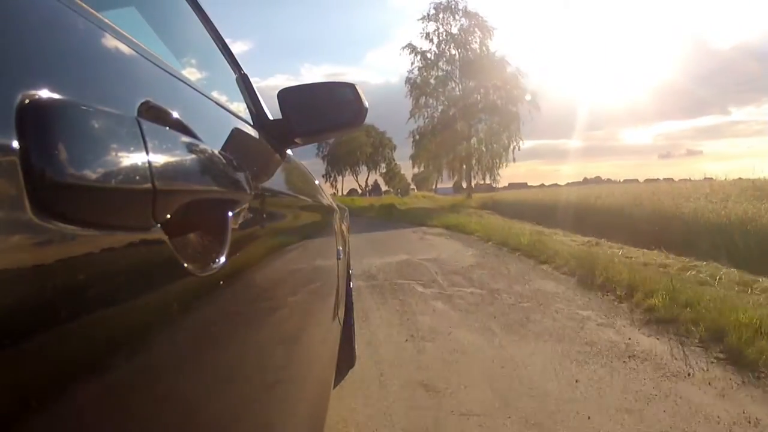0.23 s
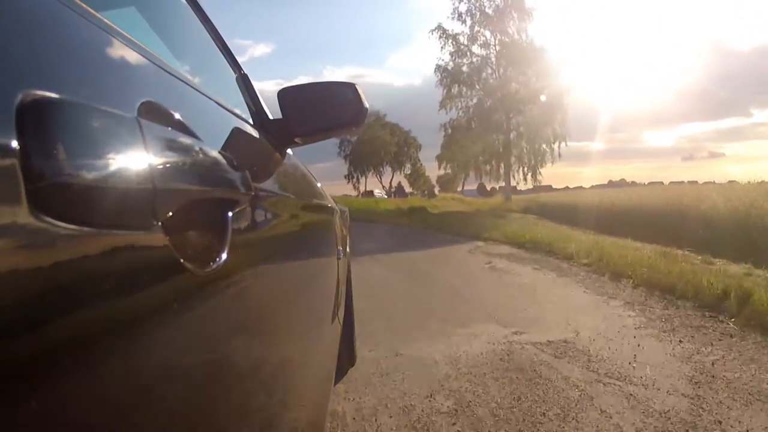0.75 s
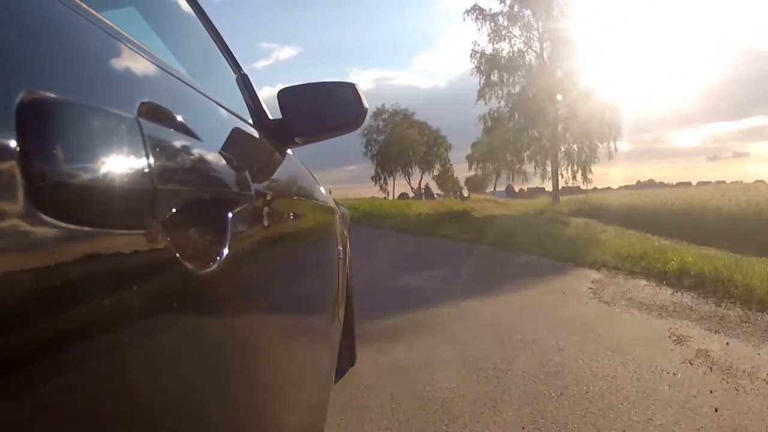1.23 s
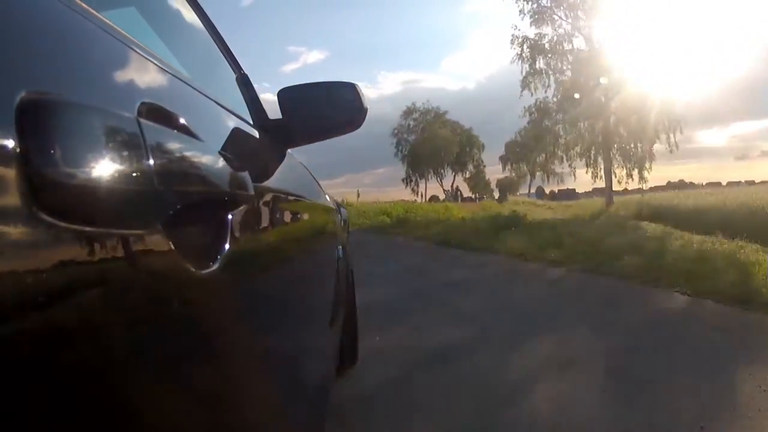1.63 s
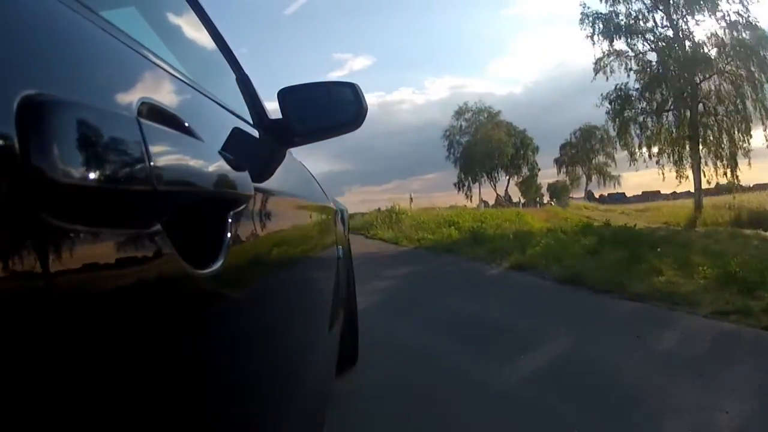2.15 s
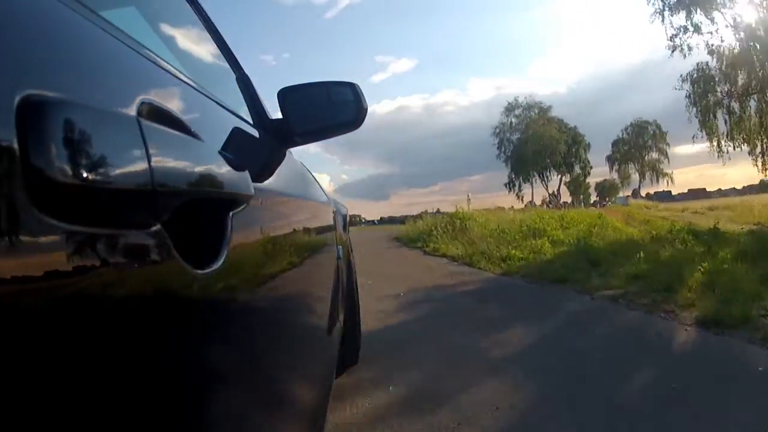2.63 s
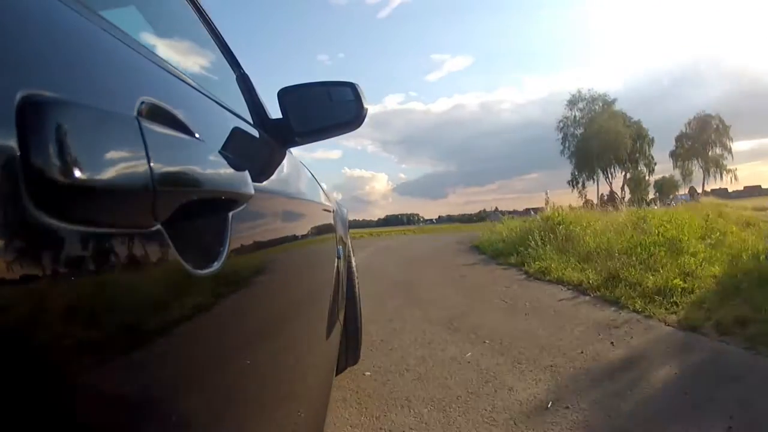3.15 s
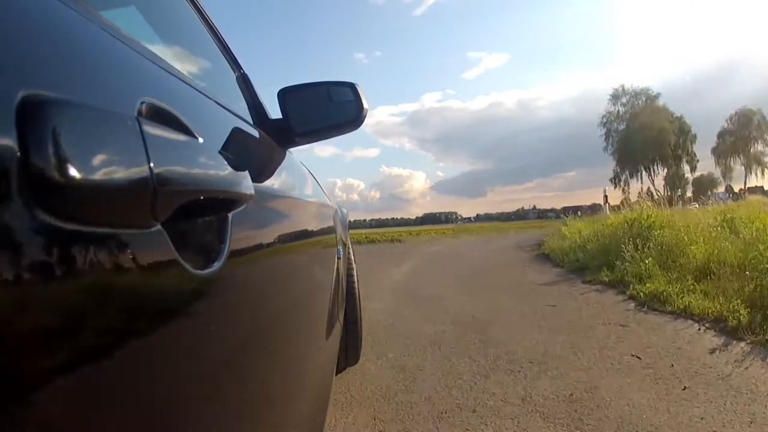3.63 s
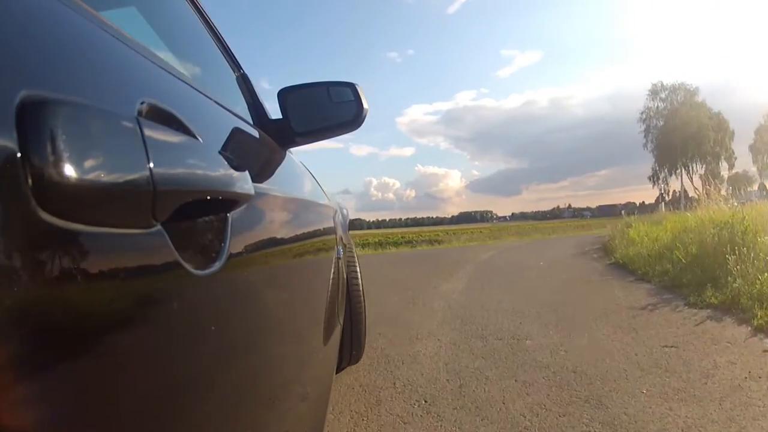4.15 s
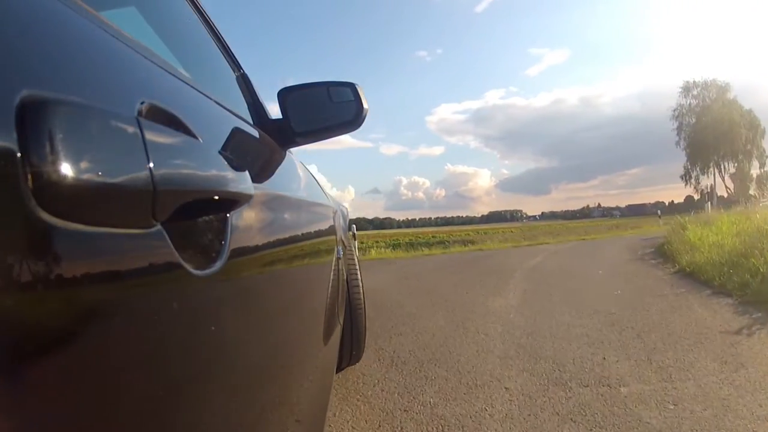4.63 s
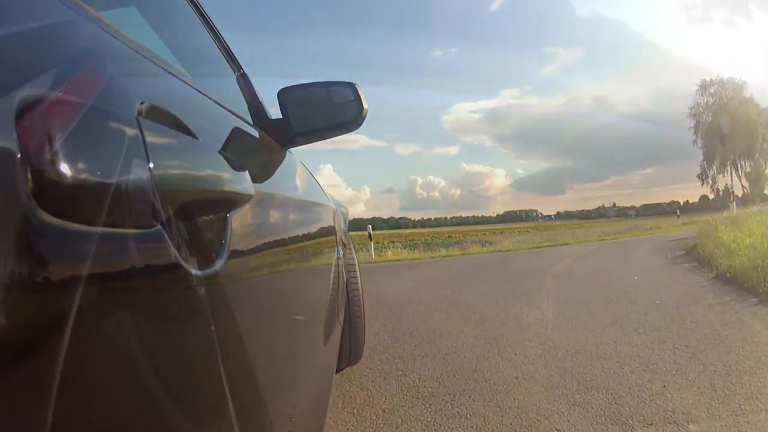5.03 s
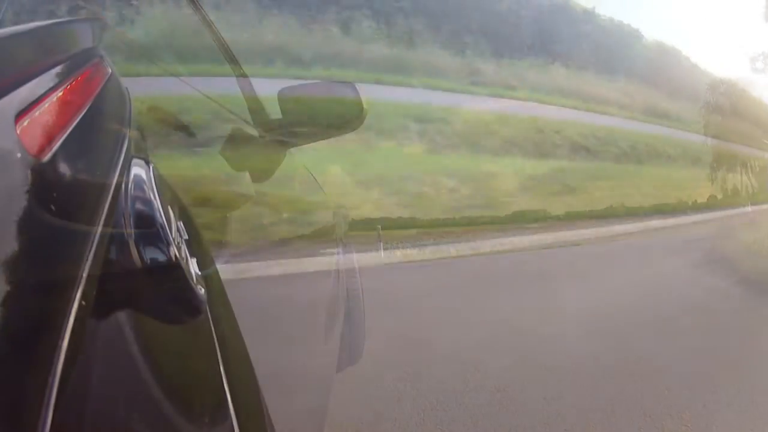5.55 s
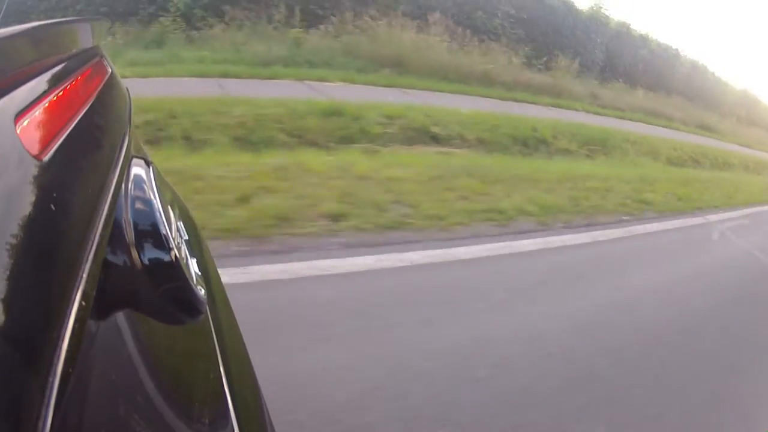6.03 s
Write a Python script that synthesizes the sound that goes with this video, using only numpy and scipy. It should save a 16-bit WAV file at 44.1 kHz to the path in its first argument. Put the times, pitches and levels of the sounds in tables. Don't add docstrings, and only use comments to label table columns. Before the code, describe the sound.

Slowed-down V8 growl with gritty tyre noise and stone ticks sinks to a quiet coasting rumble, before a swaying, buffeted exhaust drone rises.

```python
import sys
import numpy as np
from scipy import signal
from scipy.fft import rfft, irfft, next_fast_len
from scipy.io import wavfile
from scipy.ndimage import uniform_filter1d, map_coordinates

SR = 44100
rng = np.random.default_rng(int(sys.argv[2]) if len(sys.argv) > 2 else 0)


def log_audio(samples):
    frames = np.atleast_2d(samples).T
    limited = np.clip(frames, -1, 1)
    pcm = np.round(limited * 32767).astype(np.int16)
    wavfile.write(sys.argv[1], SR, pcm)


def gain_from_db(level_db):
    decades = np.asarray(level_db, float) / 20
    return 10 ** decades


N = 277377

# [pipe lag t/s, loaded bark level/dB, coasting bark level/dB]
CYLINDERS = [(0, 0, 0), (-.003, -9, -12), (0, -18, -14), (0, -18, -15), (-.002, -15, -11), (0, -18, -14),
             (0, -17, -13), (0, -17, -8)]
# [f/Hz, width/Hz, level/dB]
OVERRUN = [(205, 25, -4), (255, 25, -4), (290, 45, -1), (365, 40, -5), (480, 25, -13)]


def unit(x):
    return x / np.sqrt(np.mean(x ** 2) + 1e-20)


def along(points, hz):
    f, v = np.transpose(points)
    return np.interp(np.log(hz + 1), np.log(f + 1), v)


def curves(rows):
    s, *cols = np.transpose(rows)
    return [np.interp(np.arange(N) / SR, s, c) for c in cols]


def ramp(start_s, end_s):
    return np.interp(np.arange(N) / SR, [start_s, end_s], [0, 1])


def wobble(rate):
    knots = rng.standard_normal(int(N * rate / SR) + 4)
    return map_coordinates(knots, [np.arange(N) * rate / SR])


def filtered(x, response):
    m = next_fast_len(N + SR // 2)
    return irfft(rfft(x, m) * response(np.fft.rfftfreq(m, 1 / SR)), m)[:N]


def above(f, corner_hz, power):
    return 1 / (1 + (corner_hz / (f + 1)) ** power)


def below(f, corner_hz, power):
    return 1 / (1 + (f / corner_hz) ** power)


def noise(spectrum):
    return unit(filtered(rng.standard_normal(N), lambda f: gain_from_db(along(spectrum, f))))


def modes(table):
    def response(f):
        total = 0
        for k, (centre, width, db) in enumerate(table):
            damping = 1j * f * width
            total = total + (-1) ** k * gain_from_db(db) * damping / (centre * centre - f * f + damping)
        return total
    return response


def pipe(table):
    lowest, highest = table[0][0], table[-1][0]
    return lambda f: modes(table)(f) * below(f, 1.23 * highest, 8) * above(f, 0.98 * lowest, 6)


def evened(x, span_s):
    return x / np.sqrt(np.abs(uniform_filter1d(x ** 2, int(span_s * SR))) + 1e-9)


def blown(at, size_db, response):
    return evened(filtered(np.bincount(at, gain_from_db(size_db), N), response), .35)


def struck(s, db, hz, width_hz):
    blow = np.bincount([round(s * SR)], [-gain_from_db(db) * SR / (2 * np.pi * width_hz)], N)
    return filtered(blow, modes([(hz, width_hz, 0)]))


def knocks(events, length_s, attack_s, crack, tone):
    out, t = np.zeros(N + SR), np.arange(int(length_s * SR)) / SR
    for s, db, hz, t60 in events:
        shape = gain_from_db(db - 60 * t / max(t60, .002)) * (1 - np.exp(-t / attack_s))
        ring = tone * np.sin(2 * np.pi * hz * t)
        burst = crack * np.sign(rng.standard_normal(len(t)))
        out[round(s * SR):][:len(t)] += shape * (ring + burst)
    return out[:N]


def firings(cycle, jitter_s, scatter_db):
    at = np.flatnonzero(np.diff(np.floor(8 * cycle))) + 1
    cylinder = np.floor(8 * cycle[at]).astype(int) % 8
    luck = rng.standard_normal((len(at), 2))
    late_s = np.array(CYLINDERS)[cylinder, 0] + jitter_s * luck[:, 0]
    late = np.round(late_s * SR).astype(int)
    return np.clip(at + late, 0, N - 1), cylinder, scatter_db * luck[:, 1]


def drone(cycle, order, db, rough_db):
    phase = 2 * np.pi * order * cycle + 0.028 * wobble(14)
    return np.sqrt(2) * gain_from_db(db + rough_db * wobble(16)) * np.sin(phase)


def launch():
    bite_s, fade_s = 0.45, 0.044
    return 1 / (1 + np.exp(np.clip((np.arange(N) / SR - bite_s) / fade_s, -50, 50)))


def tailpipe(f):
    # [f/Hz, level/dB]
    pipe_gain = [(200, -38.5), (260, -5.5), (310, 8.5), (390, 3.5), (440, -6.5), (480, -2), (560, -10),
                 (650, -29), (900, -60)]
    # [f/Hz, group delay t/s]
    baffle_delay = [(250, -.001), (400, .001), (450, .007), (550, .014), (650, .018)]
    turns = np.cumsum(along(baffle_delay, f)) * f[1]
    return -gain_from_db(along(pipe_gain, f)) * np.exp(-2j * np.pi * turns)


def front_bark(at, cylinder, luck_db, load, uneven):
    _, loaded_db, coasting_db = np.array(CYLINDERS)[cylinder].T
    loaded = blown(at, uneven[at] * loaded_db + luck_db, tailpipe)
    early = at - 220 * (at > 220)
    coasting = blown(early, coasting_db + luck_db, pipe(OVERRUN))
    return np.sqrt(load) * loaded + np.sqrt(1 - load) * coasting


def silencer_throb(at, cylinder, luck_db, load):
    # [f/Hz, width/Hz, level/dB]
    cavity = [(137, 34, -0.5), (170.6, 29.4, 0.5), (189.7, 23.3, 1), (223.4, 20.8, -2.5),
              (252.6, 17.5, -1.5)]
    residue = [-1, -7, -5, 0, 4, 3, -2, 1]
    return blown(at, load[at] ** 2 * np.array(residue)[cylinder] + luck_db, pipe(cavity))


def far_pipe(at, cylinder, luck_db, bark_db):
    # [cylinder, lag t/s, f/Hz, width/Hz]
    paths = [(2, .013, 310, 170), (5, .017, 490, 130), (5, .009, 290, 170)]
    # [t/s, first level/dB, second level/dB, third level/dB]
    path_levels = [(0, -24, -24, -20), (.5, -17, -24, -22), (.7, -10, -21, -24), (1.3, -10, -16, -24),
                   (2.1, -12, -14, -21), (3, -12, -20, -16), (4.2, -9, -18, -13)]
    out = np.zeros(N)
    for (which, lag_s, hz, width_hz), far_db in zip(paths, curves(path_levels)):
        mine = cylinder == which
        late = np.minimum(at[mine] + round(lag_s * SR), N - 1)
        narrow = modes([(hz, width_hz, 0)])
        out -= gain_from_db(bark_db + far_db) * blown(late, luck_db[mine], lambda f: narrow(f) ** 4)
    return out


def front_drone(cycle, hz, bark_db, load, slip):
    # [f/Hz, level/dB]
    boom = [(42, -5), (46, -11.5), (54, 3.5), (62, 5.5), (70, 0.5), (80, 4.5), (90, -4), (96, -9)]
    # [f/Hz, level/dB]
    octave_boom = [(84, 14.5), (88, 10), (94, 0), (110, -11), (125, -14), (148, -35), (192, -36.5)]
    # [order per cycle, level/dB]
    burble = [(5, -9), (6, -1), (7, -7)]
    firing_db = bark_db + along(boom, hz) + 10 * slip
    octave_db = bark_db + along(octave_boom, 2 * hz) + 12 * slip - 2.5
    octave_db += 3.5 * np.cos(np.pi * (cycle + .1)) ** 24
    octave_db += 2 * np.cos(np.pi * (cycle - .27)) ** 24
    out = drone(cycle, order=8, db=firing_db, rough_db=1.2)
    out += drone(cycle, order=16, db=octave_db, rough_db=.7)
    for order, db in burble:
        out += load ** 2 * drone(cycle, order=order, db=bark_db - 9 + db, rough_db=1.8)
    return out


def gas_churn():
    # [f/Hz, level/dB per Hz]
    rumble = [(65, -32.5), (110, -30), (141, -13.5), (281, -12.5), (422, -12.5), (490, -14.5), (564, -26),
              (650, -29.5), (840, -59), (1430, -120)]
    return noise(rumble)


def floor_pan():
    return noise([(40, -38.0), (56, -5), (95, -9.5), (125, -3.5), (160, -33.5), (300, -120)])


def front_exhaust():
    # [t/s, firing rate f/Hz]
    revs = [(0, 93.63), (.3, 96.25), (.6, 96.1), (.9, 96.54), (1.2, 94.51), (1.45, 92.71), (1.7, 84.59),
            (2, 73.82), (2.3, 65.12), (2.7, 59.61), (3.1, 53.74), (3.6, 46.92), (4.1, 44.33), (4.6, 42.63),
            (5.4, 41.5), (6.3, 41)]
    # [t/s, opening 0-1, unevenness of the cylinders]
    throttle = [(0, 0.82, 0.49), (.45, 0.93, 0.57), (.65, 0.89, 1.18), (1.4, 0.86, 0.91), (2.1, 0.81, 0.69),
                (3.2, 0.07, 0.073), (5.1, 0.08, 0.99)]
    # [t/s, bark level/dB]
    effort = [(0, -12.5), (.52, -13), (.67, -10), (.9, -13.5), (1.25, -13), (1.4, -19), (1.63, -16),
              (1.72, -18.5), (1.95, -18.5), (2.1, -24.5), (2.4, -25.5), (2.7, -29), (3.2, -29.5),
              (3.4, -33), (3.65, -31), (4.0, -33.5), (5.0, -33.5), (5.3, -43)]
    hz, bark_db, slip = curves(revs)[0], curves(effort)[0], launch()
    cycle = -.24 + np.cumsum(hz) / SR / 8
    load, uneven = np.clip(curves(throttle), 0, 1.5)
    load = np.minimum(load, 1)
    at, cylinder, luck_db = firings(cycle, jitter_s=.0003, scatter_db=1.2)
    luck_db = luck_db * (1 + 2 * (1 - load[at]))
    idle_hz = 44
    throb_db = bark_db - 0.162 * (hz - idle_hz) + 6.5 * slip + 5.44 * load
    churn_db = bark_db - 5 - 11 * load
    floor_db = bark_db - 4.5 - 6.5 * load - 7.5 * slip
    out = gain_from_db(bark_db - 1.0) * front_bark(at, cylinder, luck_db, load, uneven)
    out += gain_from_db(throb_db) * silencer_throb(at, cylinder, luck_db, load)
    out += far_pipe(at, cylinder, luck_db, bark_db)
    out += gain_from_db(churn_db) * gas_churn()
    out += front_drone(cycle, hz, bark_db, load, slip)
    out += gain_from_db(floor_db) * floor_pan()
    return out * (1 - ramp(4.52, 6.3))


def wind_buffet(scrub_db):
    # [f/Hz, level/dB per Hz]
    buffet = [(12, -5.5), (25, -2.5), (40, 1), (60, 22.5), (100, 14.5), (200, -32.5)]
    # [t/s, level/dB on the buffet]
    gusts = [(.45, 1.5), (.82, 4), (1.5, 6.5), (1.9, -3), (2.15, 3), (2.6, 0), (3.3, 3), (5.1, 3), (5.4, 2),
             (5.9, 7), (6.2, 1.5)]
    t, gust_s = np.arange(N) / SR, 0.19
    gust_db = sum(db * np.exp(-((t - s) / gust_s) ** 2) for s, db in gusts)
    buffet_db = -37 + 0.67 * (scrub_db + 54.0) + gust_db
    return gain_from_db(buffet_db) * unit(gain_from_db(1.5 * wobble(12)) * noise(buffet))


def air_roar():
    # [t/s, roar level/dB]
    airflow = [(0, -33), (.6, -35), (.9, -35.5), (1.1, -32), (1.3, -33), (2.0, -37), (2.6, -39),
               (3.0, -42.5), (3.7, -48), (4.95, -49), (5.2, -43), (5.45, -45), (5.75, -37.5), (6.29, -41.5)]
    # [f/Hz, level/dB per Hz]
    roar = [(360, 1.5), (620, -1.5), (751, -9.5), (828, -13), (1120, -14.5), (1270, -18.5), (1680, -30.5),
            (2000, -20), (2600, -30.5), (4400, -120)]
    hum = noise([(1300, -51.0), (1550, -1.0), (1650, -2.5), (1800, 2.5), (2100, -41.5)])
    flow = unit(gain_from_db(0.37 * wobble(17)) * noise(roar))
    return gain_from_db(curves(airflow)[0] + 6.0) * flow + gain_from_db(-60) * hum


def tyre_scrub(scrub_db):
    # [f/Hz, level/dB per Hz]
    scrub_spectrum = [(760, -5), (1300, -8), (1420, -2.5), (1850, -8), (2130, 1), (2980, -1.5), (3790, -11),
                      (5040, -23.5), (5540, -22), (5900, -51), (7670, -86), (13000, -120)]
    # [t/s, share of added treble]
    spin = [(0, 0.9), (.72, 0.32), (.9, 0.26), (1.25, 0.98), (1.35, 0.72), (2, 0.66), (5.0, -0.34),
            (5.3, -0.51), (6.3, -0.61)]
    grain = gain_from_db(wobble(15) + 1.4 * wobble(90) + 2 * wobble(500))
    chippings_per_s = 25
    chips = (rng.random(N) < chippings_per_s / SR) * gain_from_db(8 + 8.5 * rng.standard_normal(N))
    chips = signal.lfilter([1], [1, -.985], chips)
    scrub = noise(scrub_spectrum)
    treble = filtered(scrub, lambda f: above(f, 3600, 6))
    scrub = scrub + 1.1 * curves(spin)[0] * treble
    return gain_from_db(scrub_db) * (grain + 0.057 * chips) * scrub


def road():
    # [t/s, scrub level/dB]
    tyres = [(0, -46.5), (.2, -40), (.5, -42), (.74, -43.5), (.9, -35), (.97, -40), (1.03, -36), (1.2, -35),
             (1.28, -41.5), (1.7, -45), (2.0, -47), (3.0, -51), (3.7, -54.5), (5.1, -57), (5.35, -53),
             (5.5, -50), (5.7, -50), (6.29, -51.5)]
    scrub_db = curves(tyres)[0]
    return wind_buffet(scrub_db) + air_roar() + tyre_scrub(scrub_db)


def overload_pops():
    # [t/s, peak level/dB]
    crackles = [(.023, -24), (.105, -24), (.189, -23), (.248, -29), (.273, -20), (.356, -29), (.438, -24),
                (.588, -25), (.605, -23), (.688, -16), (.773, -27)]
    # [f/Hz, width/Hz, level/dB]
    crackle_bands = [(760, 220, -11), (1050, 220, -11), (1400, 260, -14)]
    pops = sum(struck(s + .001, db + 24, 1100, 1500) for s, db in crackles)
    return filtered(pops, lambda f: (modes(crackle_bands)(f) + 0.097) * above(f, 600, 4) * below(f, 2300, 4))


def arch_grit():
    # [t/s, peak level/dB, f/Hz]
    stones = [(0.275, -33.5, 3030), (0.365, -29.5, 2520), (0.807, -44, 2580), (0.894, -29, 2330),
              (1.1634, -21.5, 2150), (1.206, -32.5, 2620), (1.4092, -20.5, 3100), (1.5115, -23.5, 2320),
              (1.556, -16.5, 4790), (1.8774, -25, 3770), (2.03, -38.5, 2180), (2.3338, -35, 2090),
              (2.59, -31, 2260), (2.68, -27.5, 2090), (2.796, -32.5, 2170), (2.849, -37, 2780),
              (3.019, -37, 2910), (3.034, -30.5, 2160), (3.3114, -36.5, 2740), (3.147, -30.5, 2390),
              (3.639, -35.5, 2700), (3.988, -32, 2280), (0.051, -42, 2950), (.19, -21, 3570),
              (.2304, -33, 3000), (.5457, -40, 2750), (0.6735, -34, 2800), (0.8504, -31.5, 2860),
              (1.0174, -27, 2570), (1.097, -32, 2540), (4.32, -39.5, 3200), (5.319, -44, 1990)]
    t60_s = 0.011
    grit = knocks([(*hit, t60_s) for hit in stones], .04, attack_s=0.00031, crack=2.06, tone=1.0)
    return filtered(grit, lambda f: above(f, 1700, 4) * below(f, 4200, 4))


def low_thumps():
    # [t/s, peak level/dB, f/Hz, t60 t/s]
    jolts = [
        (0.571, 0.5, 93, 0.085),
        (5.172, -9.5, 79.7, 0.26),
        (5.261, 5, 70.0, 0.03),
        (5.331, -2.5, 85, 0.14),
        (5.429, -3.5, 67.2, 0.13),
        (5.49, 6.5, 81.27, 0.03),
        (5.601, 6, 92, 0.037),
        (5.667, -6, 53.7, 0.18),
        (5.717, -5, 60.3, 0.098),
        (6.046, 1, 57.26, 0.042),
    ]
    return knocks(jolts, .2, attack_s=.016, crack=0, tone=2.2)


def sill_stones():
    # [t/s, peak level/dB, f/Hz, width/Hz]
    blows = [
        (3.4256, -7, 1690, 2610),
        (3.4275, -23, 1170, 300),
        (3.4283, -15.5, 2980, 457),
        (3.4288, -27, 1160, 250),
        (4.3264, -13.5, 3000, 810),
        (4.3266, -8, 4720, 1390),
    ]
    # [t/s, peak level/dB, f/Hz, t60 t/s]
    tail = [
        (3.428, -35.5, 2900, .06),
    ]
    stone = knocks(tail, .06, attack_s=.001, crack=3.3, tone=0) + sum(struck(*hit) for hit in blows)
    return filtered(stone, lambda f: above(f, 600, 4) * below(f, 3900, 8))


def rubber_squeak():
    t = np.arange(N) / SR
    start_s, from_hz, to_hz, sag_s = 4.08, 5150, 4250, .022
    hz = to_hz + (from_hz - to_hz) * np.exp(-np.clip(t - start_s, 0, 1) / sag_s)
    phase = 2 * np.pi * np.cumsum(hz + 300 * wobble(600)) / SR
    swell = np.interp(t, [start_s, 4.088, 4.14, 4.165], [0, 1, 1, 0])
    return swell * gain_from_db(-61 + 3 * wobble(200)) * np.sin(phase)


def rear_exhaust():
    # [t/s, firing rate f/Hz, drone level/dB]
    rear = [(5.0, 89.3, -45), (5.2, 90.6, -24), (5.351, 88.75, -42), (5.5, 83.4, -27), (5.65, 73.9, -22),
            (5.748, 71.45, -16), (5.95, 70.67, -19), (6.19, 63.87, -14), (6.3, 60.1, -20)]
    # [f/Hz, level/dB per Hz]
    wake = [(59, -21.5), (100, 1), (189, -5.5), (311, -6.5), (356, -14.5), (489, -14), (777, -37.5),
            (1500, -41), (1950, -64), (3300, -120)]
    hz, drone_db = curves(rear)
    bark_db = -29.5 + 0.41 * (drone_db + 14)
    cycle = np.cumsum(hz) / SR / 8
    at, cylinder, luck_db = firings(cycle, jitter_s=.001, scatter_db=4)
    bark = blown(at, 0.64 * np.array(CYLINDERS)[cylinder, 2] + luck_db, pipe(OVERRUN))
    lope_db = 2.5 * np.cos(4 * np.pi * cycle) + 1.9 * wobble(30)
    tone = drone(cycle, order=8, db=drone_db - 1.5 + lope_db, rough_db=1.5)
    tone += drone(cycle, order=16, db=drone_db - 13, rough_db=2)
    sub_bass = noise([(8, -16), (18, -0.5), (35, 16), (60, -23.5), (120, -120)])
    thump = gain_from_db(-25.5 + 4.5 * wobble(24)) * sub_bass
    torn_air = gain_from_db(-21 + 1.3 * wobble(25)) * noise(wake)
    return ramp(4.805, 5.24) * (gain_from_db(bark_db) * bark + tone + torn_air + thump)


def rear_surges():
    # [t/s, peak level/dB]
    hard_firings = [(5.129, -23.5), (5.199, -16), (5.313, -38), (5.434, -18.5), (5.477, -28.5), (5.53, -26),
                    (5.574, -26.5), (5.598, -26.5), (5.677, -20.5), (5.733, -34), (5.785, -19),
                    (5.813, -23), (5.966, -28), (6.044, -29.5), (6.13, -23.5), (6.194, -26), (6.259, -29)]
    centre_hz, width_hz, rise_s_per_hz = 590, 200, .00004
    surges = sum(struck(s, db + 5, centre_hz * gain_from_db(0.39 * rng.standard_normal()), width_hz)
                 for s, db in hard_firings)

    def chirp(f):
        phase = np.pi * rise_s_per_hz * (f - 640) ** 2
        return modes([(centre_hz, 420, 0)])(f) ** 4 * np.exp(-1j * phase)
    return filtered(surges, chirp)


def rear_rattle():
    # [t/s, peak level/dB]
    ticks = [(5.2673, -56), (5.2892, -52), (5.3192, -50), (5.3556, -50), (5.3915, -54), (5.4279, -49),
             (5.4918, -55), (5.5232, -48), (5.5911, -52), (5.7397, -52), (5.7751, -39), (5.8031, -46),
             (5.808, -50), (5.8125, -44), (5.839, -49), (5.8754, -47), (5.9, -52), (5.9133, -44),
             (5.919, -47), (5.9492, -46), (5.9817, -42), (6.0111, -46), (6.047, -46), (6.0844, -46),
             (6.1139, -40), (6.1712, -58), (6.2106, -46)]
    # [f/Hz, width/Hz, level/dB]
    loose_part = [(4000, 350, -2), (5300, 350, -4)]
    burst = knocks([(s, db, 0, .009) for s, db in ticks], .03, attack_s=.0004, crack=16, tone=0)
    return filtered(burst, modes(loose_part))


def scene():
    mix = front_exhaust() + road()
    mix += overload_pops() + arch_grit() + low_thumps()
    mix += sill_stones() + rubber_squeak()
    mix += rear_exhaust() + rear_surges() + rear_rattle()
    return mix[None]


def roll_off(x):
    return signal.sosfilt(signal.butter(12, 15140, fs=SR, output="sos"), x)


def record(dry):
    hold_hz = 12000
    hard = dry[0] / (1 + np.abs(dry[0] / 1.05) ** 14) ** (1 / 14)
    base = filtered(hard, lambda f: below(f, 5500, 40))
    mirrored = base * (1 + 2 * np.cos(2 * np.pi * hold_hz * np.arange(N) / SR))
    held = filtered(mirrored, lambda f: np.sinc(f / hold_hz) * (f < 15150))
    return roll_off(np.clip(held, -1, 1)[None])


dry = scene()
out = record(dry)
log_audio(out)
```